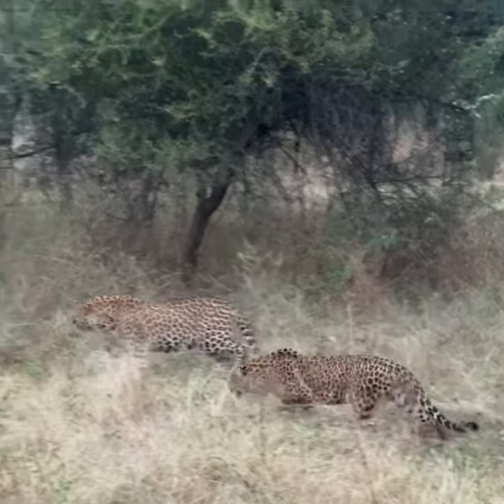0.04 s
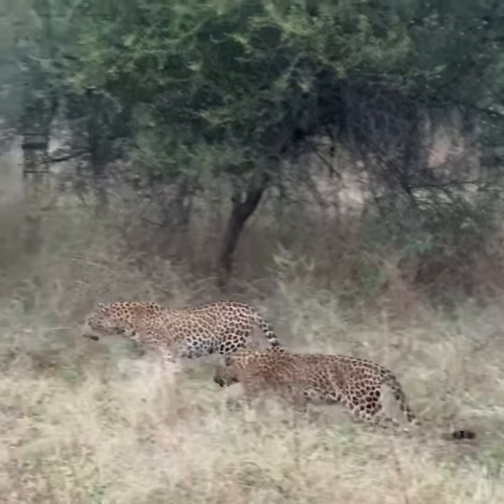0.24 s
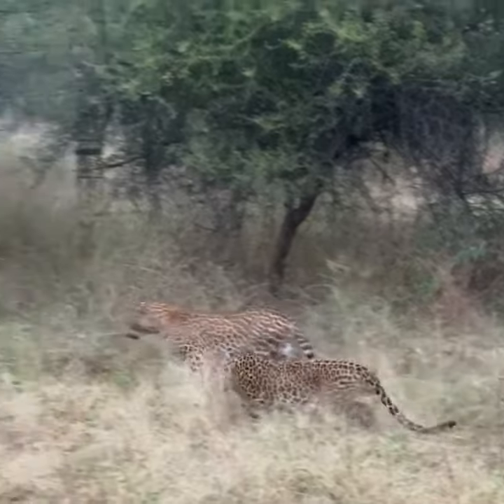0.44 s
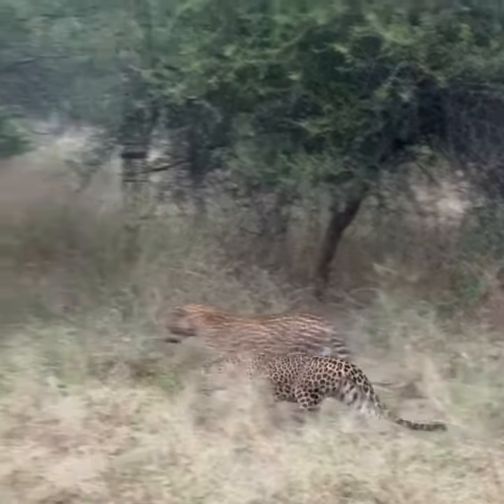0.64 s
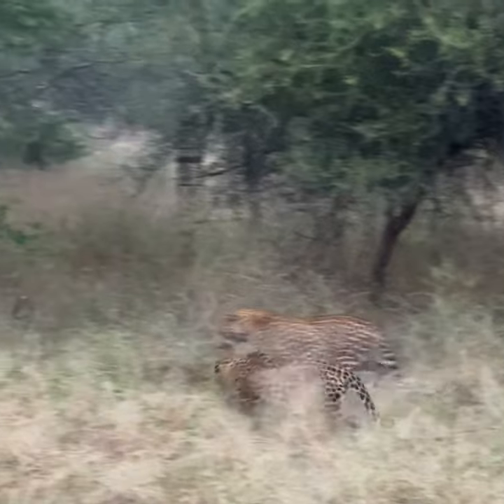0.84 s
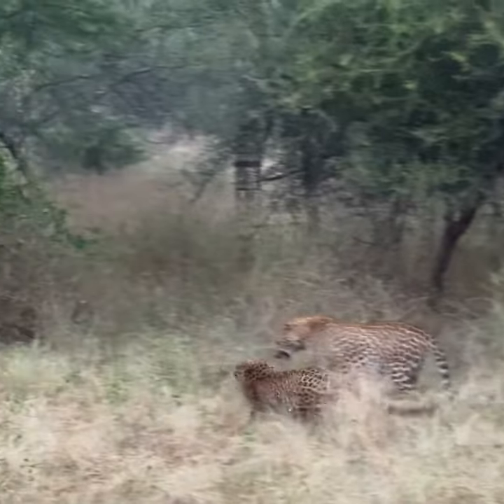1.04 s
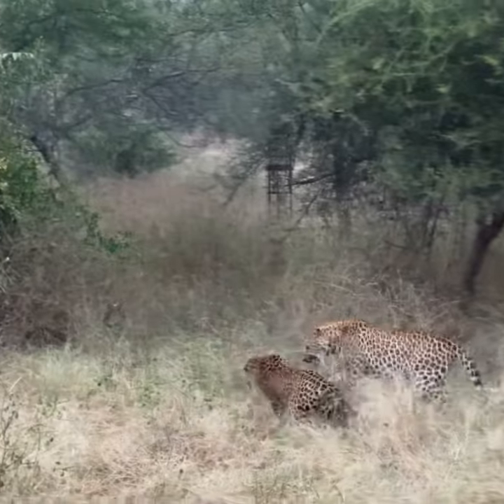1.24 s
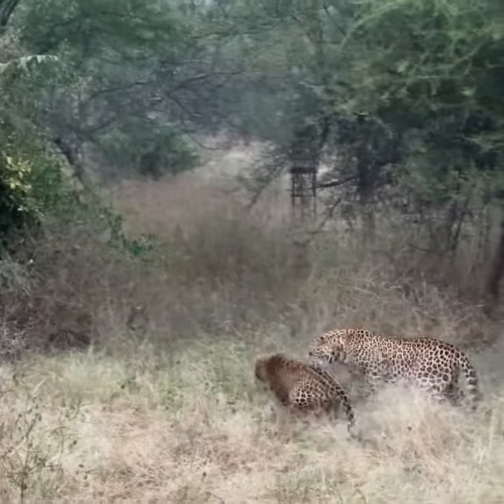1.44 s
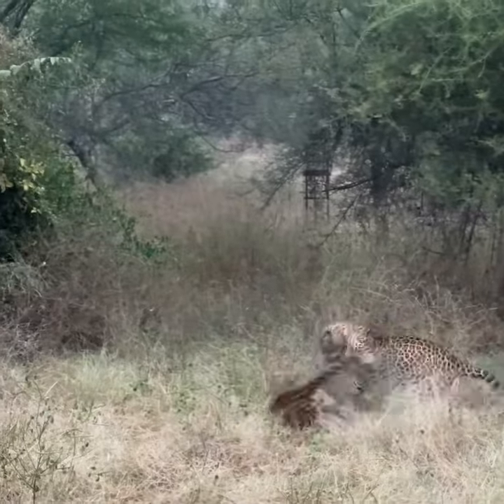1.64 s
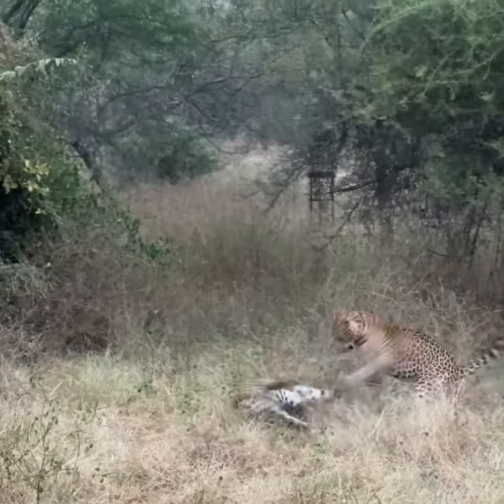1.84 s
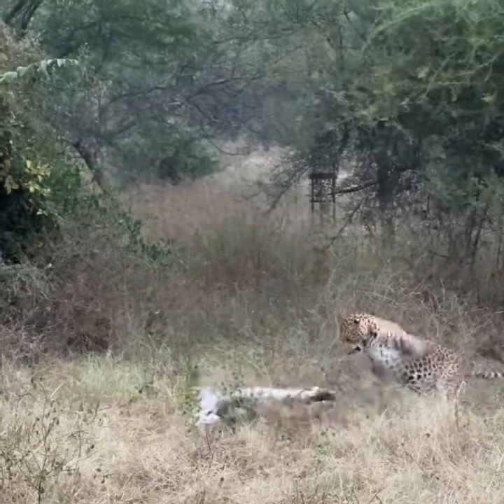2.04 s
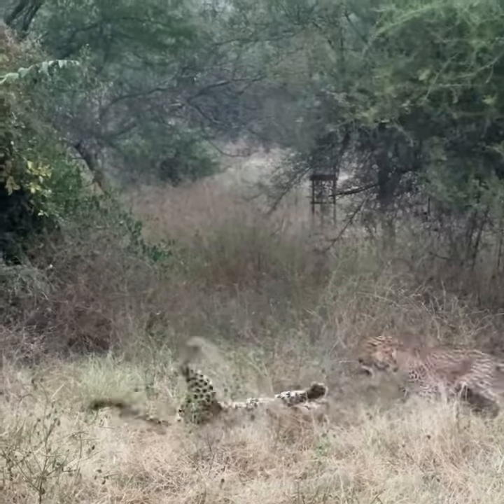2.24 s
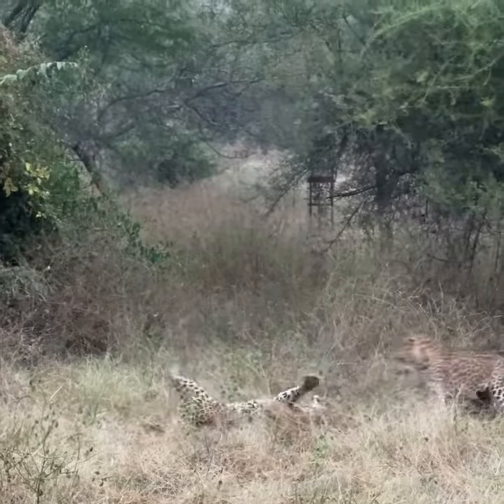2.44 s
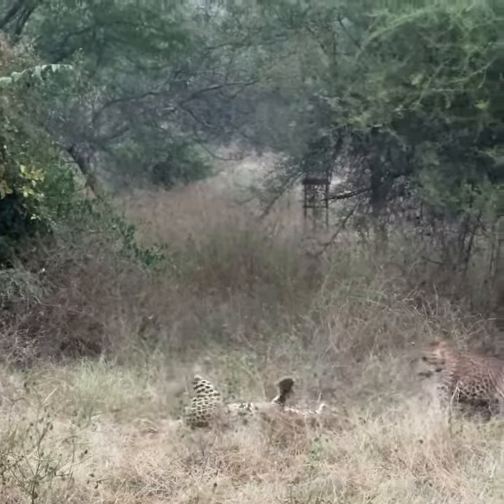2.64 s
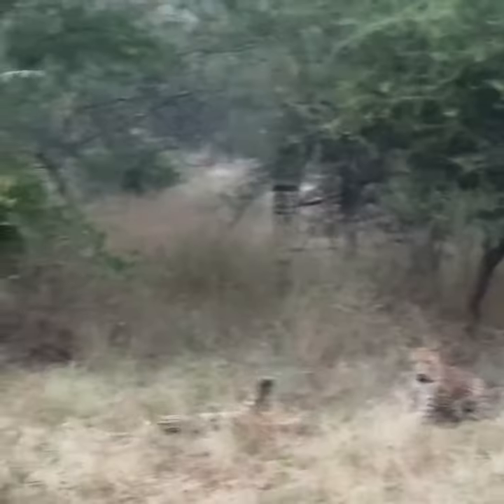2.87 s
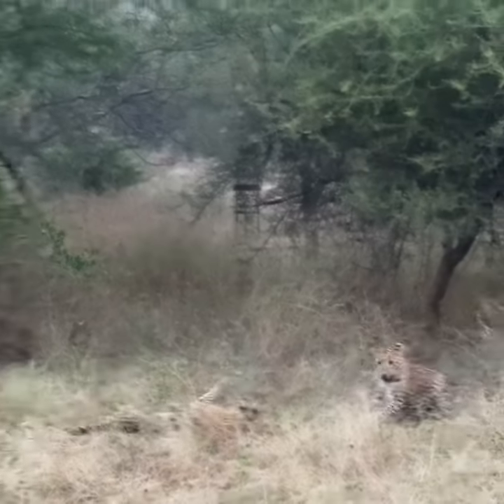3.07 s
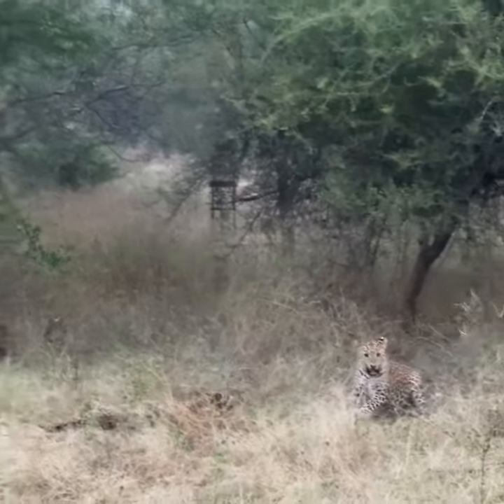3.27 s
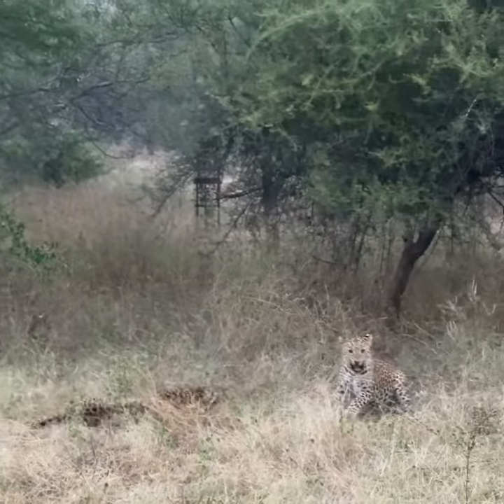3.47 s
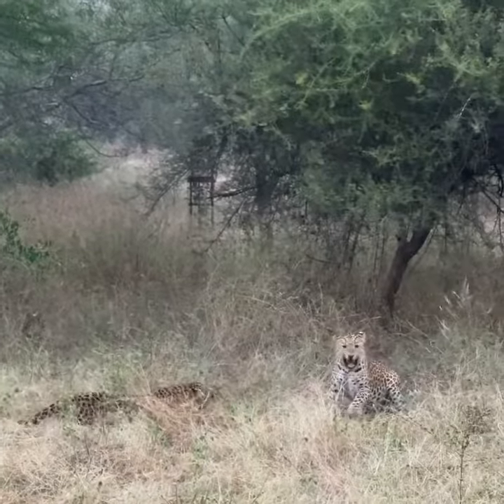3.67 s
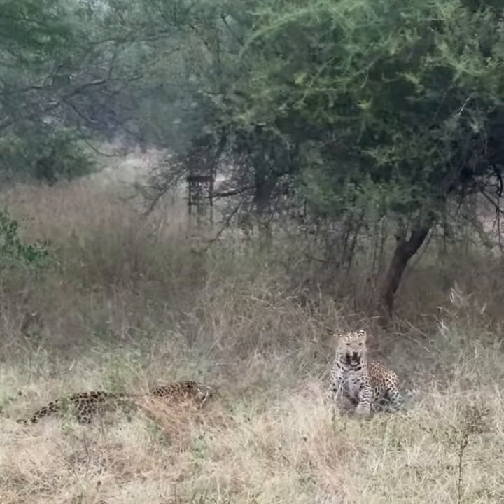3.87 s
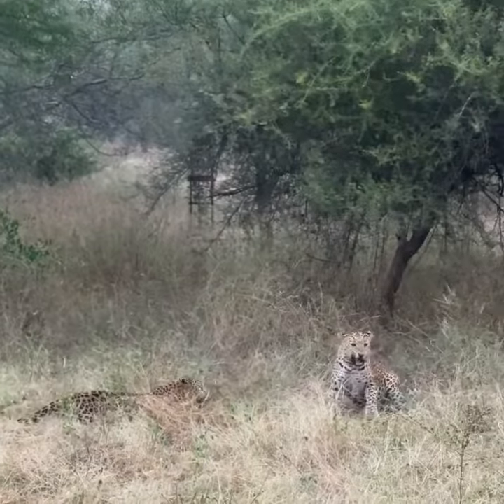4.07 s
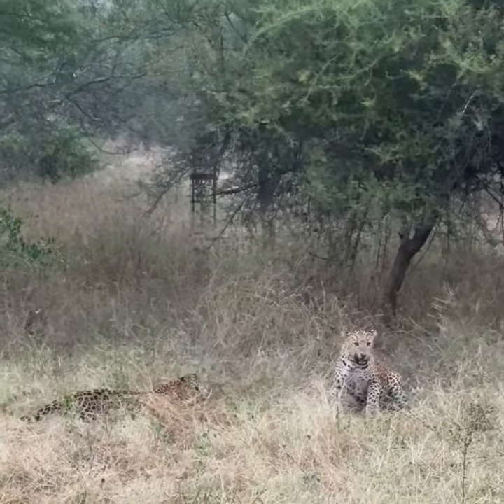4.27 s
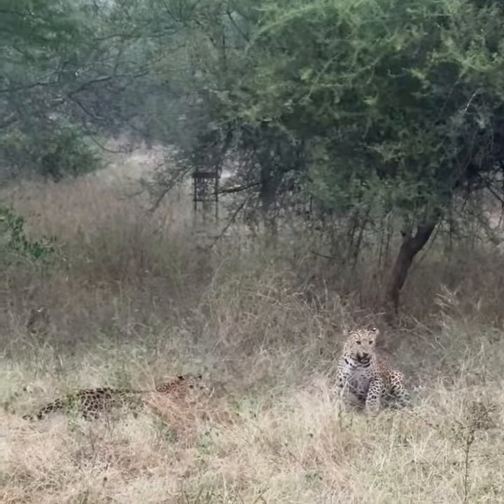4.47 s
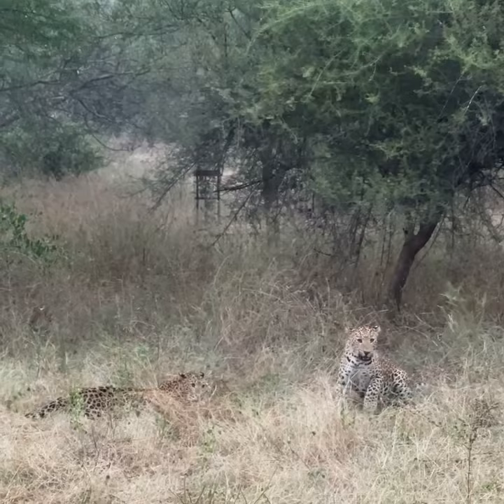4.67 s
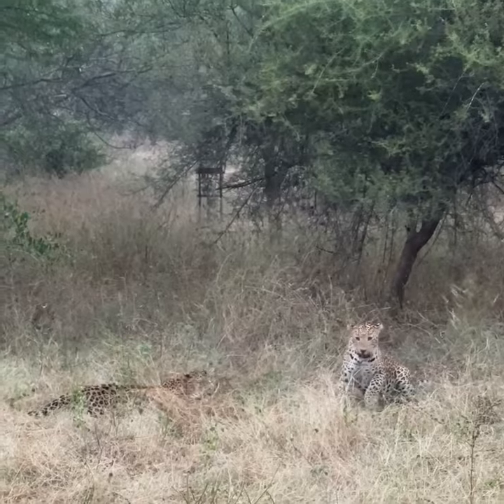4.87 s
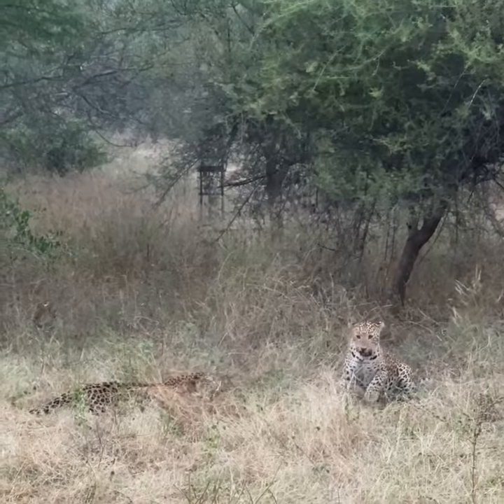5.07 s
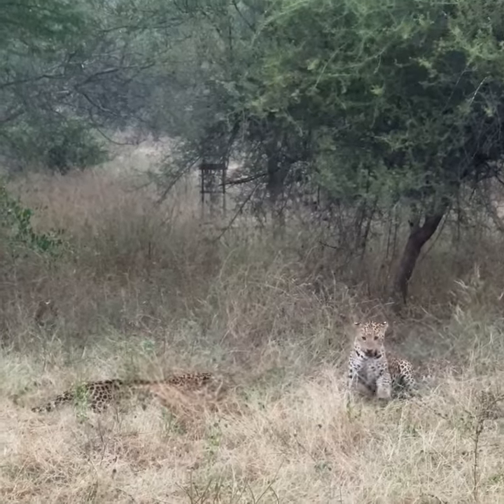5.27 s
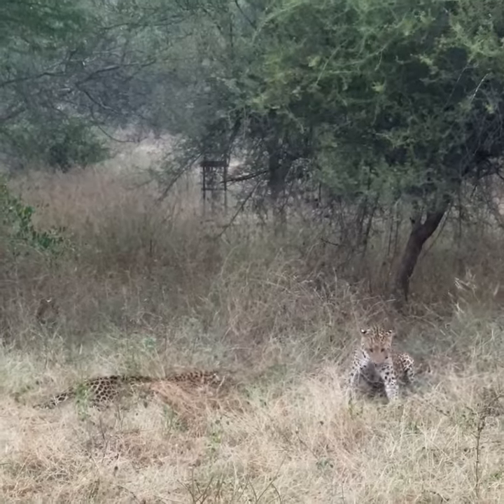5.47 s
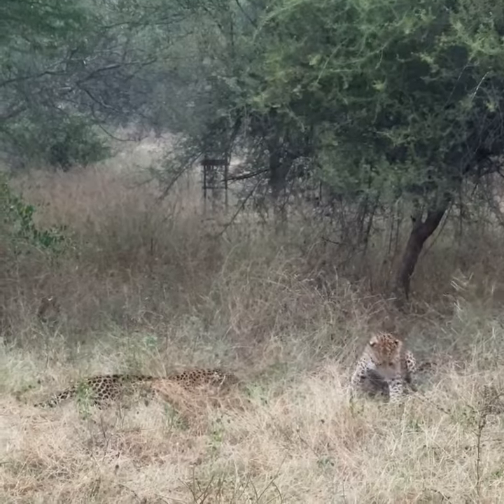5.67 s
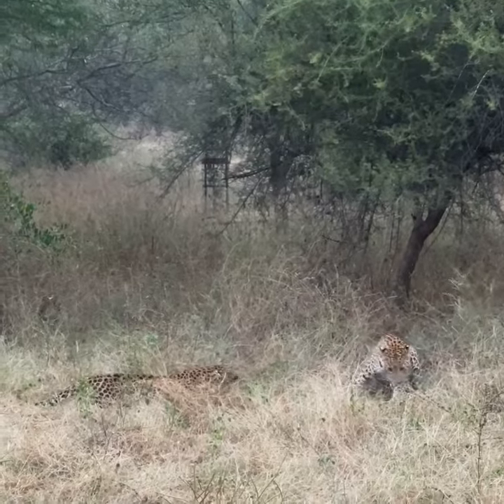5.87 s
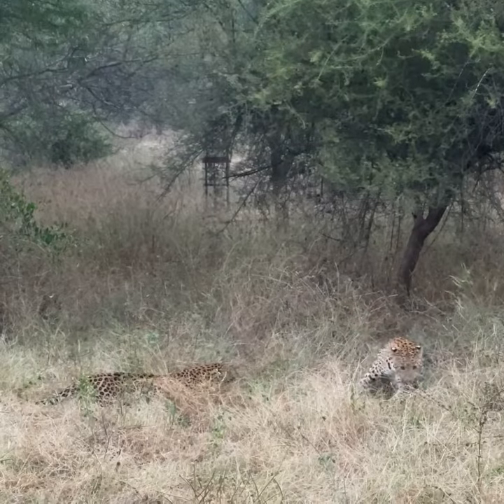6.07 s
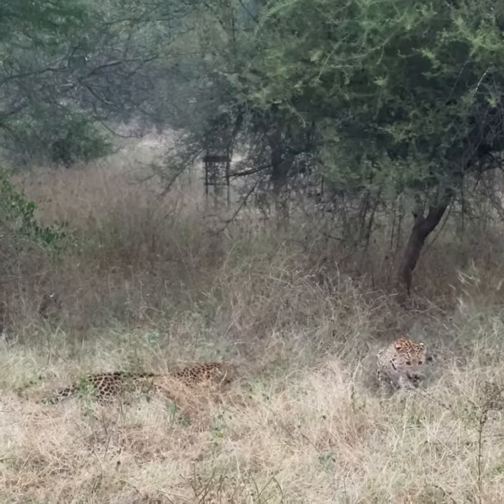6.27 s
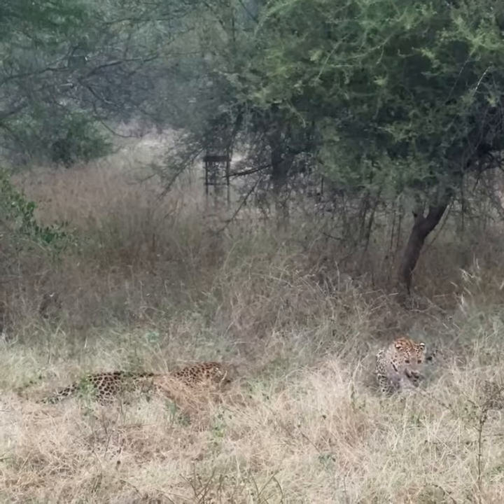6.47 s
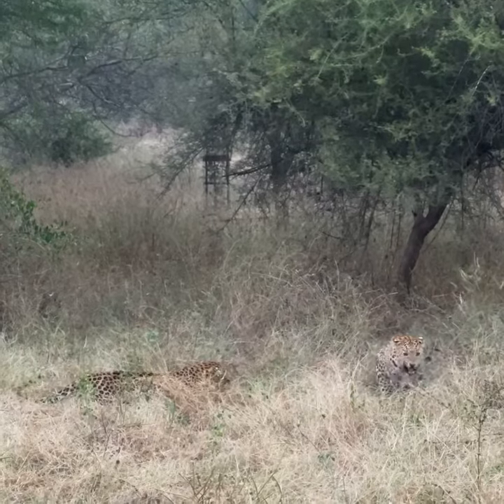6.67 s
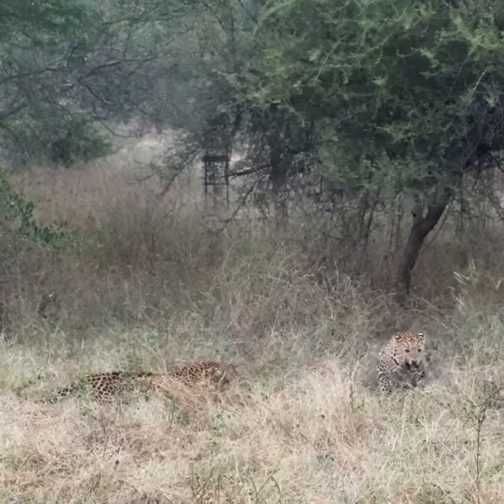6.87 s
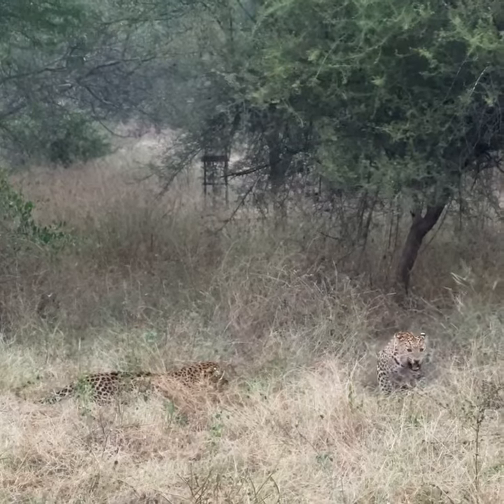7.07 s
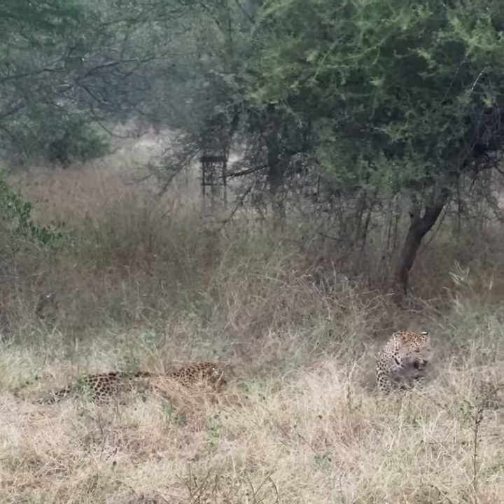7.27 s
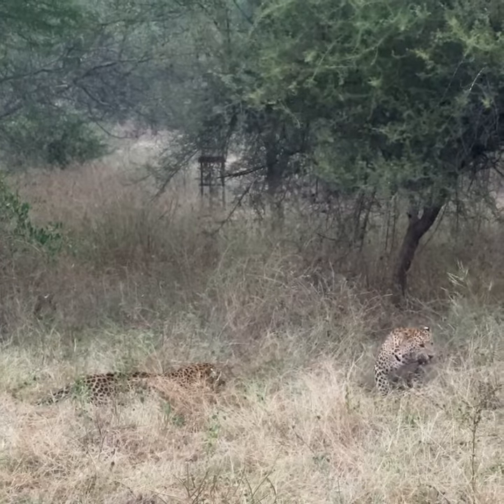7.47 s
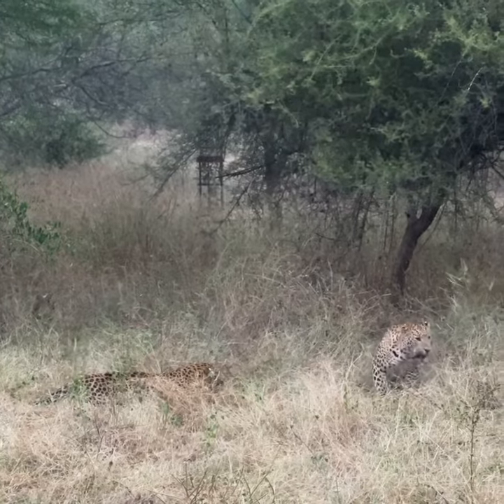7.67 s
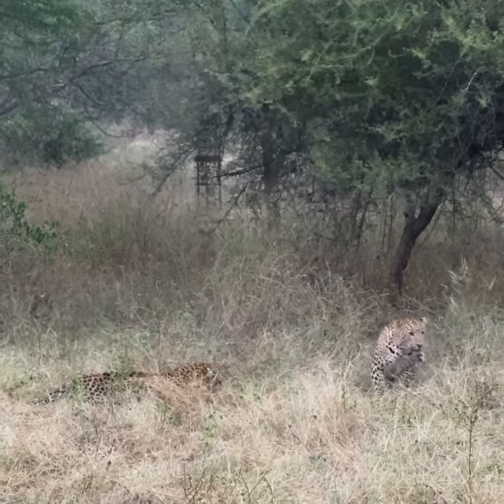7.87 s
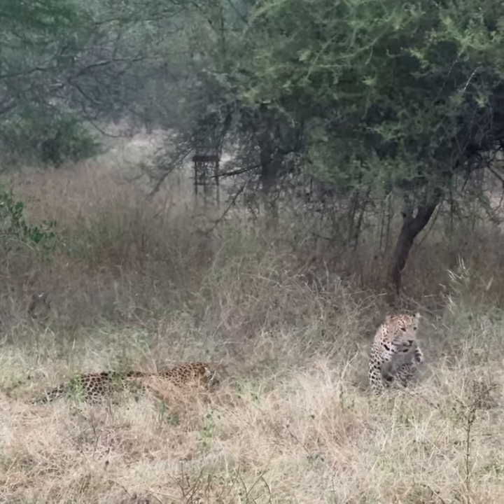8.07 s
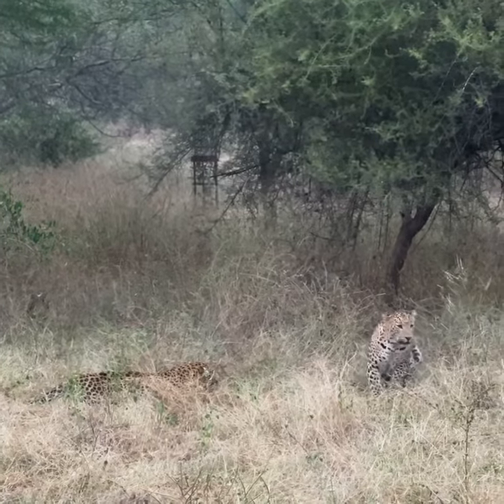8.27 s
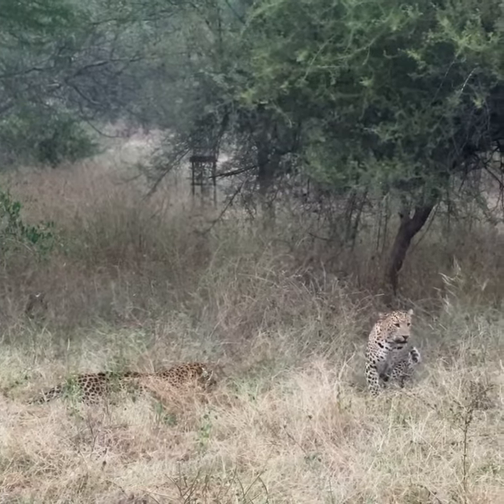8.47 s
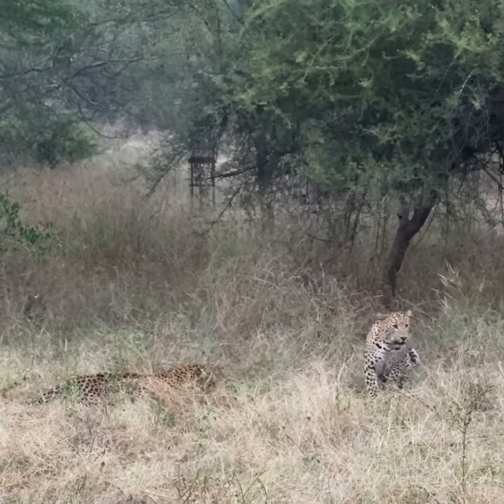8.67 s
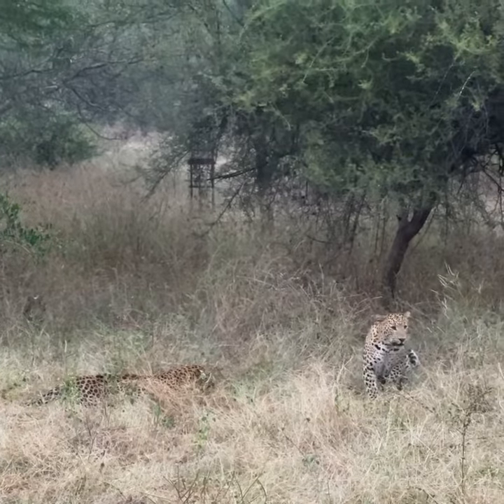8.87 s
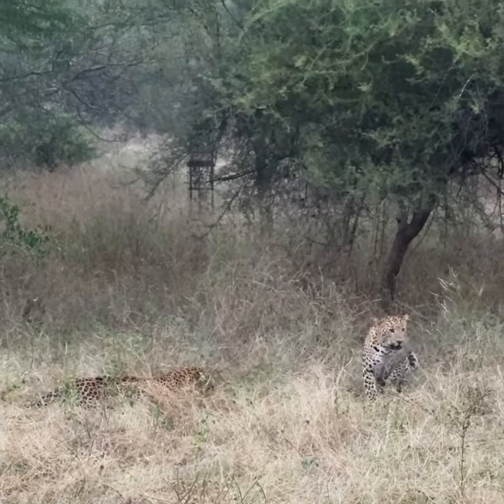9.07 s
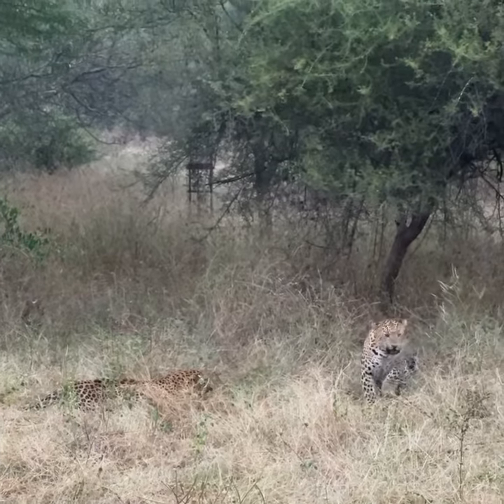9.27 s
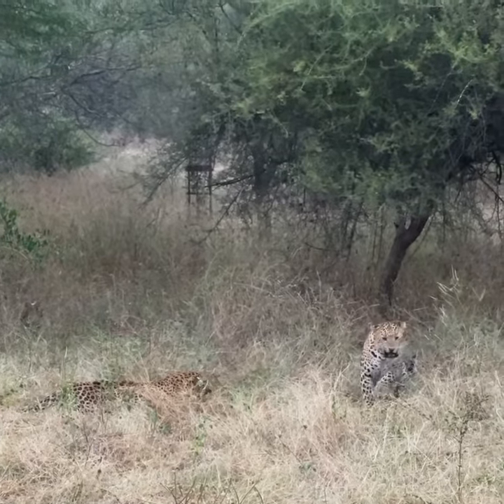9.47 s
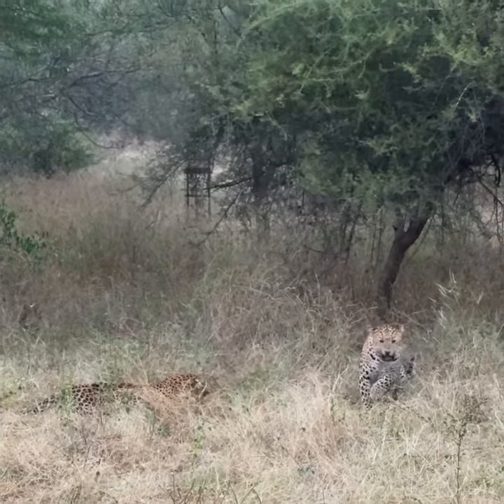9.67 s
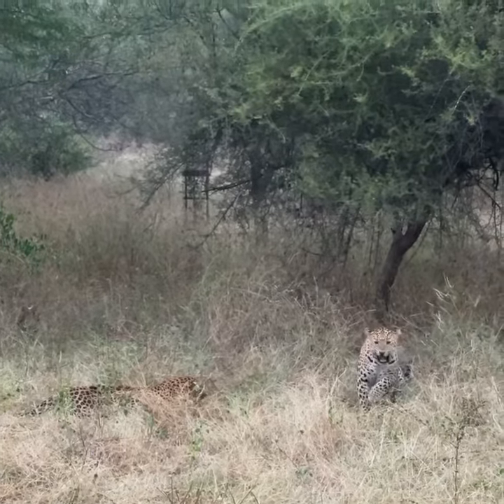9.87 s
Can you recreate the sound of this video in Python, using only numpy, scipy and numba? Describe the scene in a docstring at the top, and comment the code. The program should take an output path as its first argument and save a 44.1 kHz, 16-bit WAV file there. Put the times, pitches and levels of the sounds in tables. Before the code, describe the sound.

Leopard growls with separate fluttering pulses grow rougher and faster, peaking in a torn snarl while grass swishes and snaps. The call drops and slackens into a chesty rattle and breathy hisses. Later growls are brief and subdued, mixed with knocks, small clicks and closed-mouth rumbling. Thin bird chirps and late yelping notes sit behind. Open brushland, slight diffuse scatter, a quiet low-heavy background, handheld stereo pickup.

```python
"""A low rumble in rustling dry grass, then growls: two leopards squabble, the growl swells to a snarl,
then come hisses and weaker rumbles. Each vocal-fold flap thumps the chest, rings throat and mouth and
lets out rasping air; effort shapes each call. Single knocks and grunts are added one by one.
Noise makes hisses, snapping grass, sharp clicks and bush wash; gliding near-pure tones make the birds.
Scatter surrounds cats and birds; two microphone ports hear the treble out of step."""
import sys
import numpy as np
from scipy import signal
from scipy.fft import rfft, irfft
from scipy.io import wavfile
from scipy.ndimage import uniform_filter1d
from numba import njit

SR = 44100
rng = np.random.default_rng(int(sys.argv[2]) if len(sys.argv) > 2 else 0)


def pcm_store(signal):
    """Save signal as 16-bit PCM."""
    levels = np.round(np.clip(np.atleast_2d(signal), -1, 1) * 32767)
    wavfile.write(sys.argv[1], SR, levels.astype(np.int16).T)


N = 437472
TIME = np.arange(N) / SR
CLOCK = np.arange(0, N / SR, .002)  # control times, s
SIDES = np.array([[1], [-1]])  # left, right


def from_db(db):
    """Decibels to gain."""
    return 10 ** (np.asarray(db) / 20)


def rms_one(x):
    """Scale to rms 1."""
    return x / np.sqrt(np.mean(x ** 2) + 1e-20)


def curves(rows, at=TIME):
    """Join each table column by straight lines."""
    s, *columns = np.transpose(rows)
    return [np.interp(at, s, c) for c in columns]


def add(track, s, sound):
    """Mix a sound in at a time."""
    start = int(round(s * SR))
    low, high = max(start, 0), min(start + len(sound), N)
    if high > low:
        track[low:high] += sound[low - start:high - start]


def band(x, low_hz, high_hz, order=2):
    """Butterworth band-pass."""
    sos = signal.butter(order, [low_hz, high_hz], "band", fs=SR, output="sos")
    return signal.sosfilt(sos, x + 1e-18)


def colour(x, spectrum):
    """Minimum-phase filter with the given spectrum, by folding its cepstrum."""
    hz, db = np.transpose(spectrum)
    size = 4096
    grid_hz = np.fft.rfftfreq(size, 1 / SR)
    gain = from_db(np.interp(np.log(grid_hz + 1), np.log(hz), db))
    cepstrum = irfft(np.log(gain))
    cepstrum[1:size // 2] *= 2
    cepstrum[size // 2 + 1:] = 0
    return signal.fftconvolve(x, irfft(np.exp(rfft(cepstrum))))[:N]


def fade(x, decay_s):
    """Give every impulse an exponential tail."""
    return signal.lfilter([1], [1, -np.exp(-1 / (decay_s * SR))], x + 1e-18)


def even(x):
    """Hold the slow level at 1, keeping the single pulses."""
    size = int(.07 * SR)
    power = uniform_filter1d(uniform_filter1d(x ** 2, size), size)
    return x / np.sqrt(np.abs(power) + 1e-18)


@njit
def resonance(x, hz, width_hz):
    """Two-pole resonance with moving centre and width, gain about 1 on top."""
    y, radius = np.zeros(len(x)), np.exp(-np.pi * width_hz / SR)
    for i in range(2, len(x)):
        r = radius[i]
        drive = (1 - r * r) / 2 * (x[i] - x[i - 2])
        y[i] = drive + 2 * r * np.cos(2 * np.pi * hz[i] / SR) * y[i - 1] - r * r * y[i - 2]
    return y


def progress(s, length):
    """From 0 at the start of a gesture to 1 at its end."""
    return np.clip((CLOCK - s) / length, 0, 1)


def effort(s, length, swell_db, arch_db):
    """Effort in dB: swell is the change end to end, arch the drop from the middle to either end."""
    along = progress(s, length) - .5
    return swell_db * along - arch_db * (2 * along) ** 2


ATTACK_DB_PER_S, RELEASE_DB_PER_S = 294, 187.5  # at pace 1


def edges(s, length, pace=1):
    """Attack before a gesture and release after it, in dB."""
    attack_db = ATTACK_DB_PER_S * np.maximum(s - CLOCK, 0)
    release_db = RELEASE_DB_PER_S * np.maximum(CLOCK - s - length, 0)
    return -pace * (attack_db + release_db)


def envelopes(rows):
    """One gain curve for each level column of a gesture table."""
    db = [np.add.outer(levels, effort(s, length, swell, arch) + edges(s, length))
          for s, length, swell, arch, *levels in rows]
    return [np.interp(TIME, CLOCK, gain) for gain in from_db(np.max(db, axis=0))]


RASP_SPECTRUM = [(1000, -55), (1900, 3), (2500, 3.5), (3000, -4.5), (4000, -6.5), (5500, -6.5),
                 (12000, -23)]  # rasp colour: hz, gain_db
IDLE_DB = -57  # floor of the chest gain
GAPE_FLAPS_PER_S = 65  # here the mouth resonances are twice as wide
CLOSING_S = .0085  # flap time to slap of the folds


def leopard():
    """Chest thumps, throat ring, two mouth resonances and rasp, all driven by the same flaps."""
    flaps, rate, ribs_db = flap_times()
    thumps, throat, lower, upper, rasp, chest_hz, throat_hz, lower_hz, upper_hz = airway()
    lower_hz = lower_hz * wander(flaps, octaves=0.092)
    upper_hz = upper_hz * wander(flaps, octaves=0.096)
    # fast flaps come with a gaping mouth, which damps every resonance
    damping = 1 + np.interp(TIME, flaps, rate / GAPE_FLAPS_PER_S) ** 4
    deep_air = airflow(flaps, CLOSING_S, puff_s=0.008, slap_db=29, uneven_db=3.5, hiss_db=-14)
    air = airflow(flaps, CLOSING_S, puff_s=0.005, slap_db=29, uneven_db=4.5, hiss_db=-14)
    torn_air = airflow(flaps, CLOSING_S, puff_s=0.0045, slap_db=14, uneven_db=8.0, hiss_db=-14, soft_s=.0003)

    swept_hz = throat_hz * throat_sweep(flaps + CLOSING_S)
    throat_ring = even(band(resonance(deep_air, swept_hz, 59.0 * np.sqrt(damping)), 176, 473, order=3))
    lower_air = resonance(air, lower_hz, 55.0 * damping)
    lower_air += 0.35 * resonance(air, 0.67 * lower_hz, 70.0 * damping)
    lower_ring = even(band(lower_air, 490, 1000, order=3))
    upper_ring = even(band(resonance(air, upper_hz, 45.0 * damping), 1040, 2040, order=3))

    # higher mouth resonances move with the upper one; steady noise smooths the top
    steady_air = 0.1 * band(rng.standard_normal(N), 2200, 14000, order=1)
    ringing_air = 0.97 * torn_air + resonance(torn_air, 1.56 * upper_hz, 100.0 * damping)
    ringing_air += resonance(torn_air, 1.83 * upper_hz, 80.0 * damping)
    ringing_air += 0.86 * resonance(torn_air, 2.63 * upper_hz, 250.0 * damping)
    rasping = from_db(2.5) * rasp * even(colour(ringing_air + steady_air, RASP_SPECTRUM))

    chest_gain = np.maximum(thumps, from_db(IDLE_DB))  # faint rumble between calls
    body = chest_gain * chest(flaps, rate, np.interp(flaps, TIME, chest_hz), ribs_db)
    return body + throat * throat_ring + lower * lower_ring + upper * upper_ring + rasping


# open-mouthed calls, before effort, glide and roughness: start_s, length_s, swell_db, arch_db,
# flaps_per_s, flap_glide_octaves, ribs_re_chest_db, chest_db, throat_db, lower_mouth_db, upper_mouth_db,
# rasp_db, chest_hz, throat_hz, lower_mouth_hz, upper_mouth_hz, jaw_glide_octaves
GROWLS = [(0.403, 0.38, 3, 1.5, 28.5, 0.47, -7, -34.5, -48, -64.5, -64.5, -65.5, 231, 335, 1028, 1332, 0.035),
          (0.843, 0.28, -1, -1.5, 33, -0.1, -6.5, -31.5, -46, -53, -59, -60.5, 180, 316, 733, 1210, 0.032),
          (1.239, 0.32, 7.5, 2.5, 49, 0.25, -11, -31, -37.5, -43.5, -47.5, -51.5, 177, 370, 880, 1343, 0.14),
          (1.549, 0.12, 0, 1.5, 60.7, -0.38, -4, -25.5, -29.5, -37.5, -34.5, -46, 170, 315, 841, 1330, -0.083),
          (1.736, 0.061, 5, -3.5, 41.7, 0.18, -9, -34.5, -43.5, -55, -54, -60, 187, 328, 790, 1340, 0.092),
          (1.837, 0.058, 0, 0, 87.3, -0.28, 11, -36, -25.5, -36, -30.5, -46, 263, 370, 920, 1319, -0.064),
          (1.928, 0.063, -1.5, 4, 78, 0.032, 5, -34.5, -24.5, -35, -36.5, -46, 225, 326, 734, 1490, 0.025),
          (1.9916, 0.075, 5, 4, 78, -0.06, 9, -35.5, -23, -37, -31, -39.5, 216, 305, 796, 1370, -0.15),
          (2.084, 0.089, 0, 3, 77, -0.17, 1.5, -28, -27.5, -40.5, -38, -44, 204, 280, 684, 1320, -0.23),
          (2.214, 0.41, -13, 10.5, 48.2, -0.65, -6, -26.5, -35.5, -39, -39.5, -47, 191.7, 291, 841.7, 1439, -0.13),
          (2.714, 0.19, -1.5, 2.5, 33.6, -0.14, -7.5, -27.5, -41.5, -49.5, -54.5, -53, 187, 322, 771.2, 1180, -0.17),
          (4.287, 0.66, -4, 3, 26.8, 0.13, -5.5, -44, -69.5, -77, -74, -79, 153.9, 298.1, 1014, 1300, -0.058),
          (4.986, 0.41, -2.5, 4, 30.5, 0.19, -4.5, -36, -45.5, -62, -63.5, -62.5, 209.4, 340.3, 1120, 1420, 0.044),
          (5.519, 0.247, 4, 3.5, 30.7, 0.056, -7, -30.5, -42.5, -56.5, -54, -57.5, 160.1, 363.1, 930, 1415, -0.14),
          (5.781, 0.24, -2.5, 1.5, 31, -0.22, -3, -31.5, -42, -49, -59, -59, 165.4, 415, 884, 1218, -0.15),
          (6.93, 0.37, 0, 0.5, 22.2, -0.079, -4.5, -41.5, -54, -81, -69, -72, 236.6, 333, 952.3, 1322, -0.028),
          (9.112, 0.096, -1, 6, 23.2, -0.0099, -3, -40, -52.5, -66, -63, -78, 178.8, 342, 920, 1374, -0.19)]
# mouth shut: start_s, length_s, swell_db, arch_db, flaps_per_s, flap_glide_octaves, ribs_re_chest_db,
# chest_db, chest_hz
RUMBLES = [(0.013, 0.21, 7.5, -10, 23.8, -0.35, 0, -48, 153.5),
           (6.441, 0.33, 10, 17, 24.4, -0.14, -4, -49, 160),
           (7.571, 0.36, 2.5, 1.5, 27.7, -0.22, -10.5, -41, 167.2),
           (7.933, 0.34, -2, -0.5, 24.8, -0.39, -5.5, -45, 181.5),
           (8.347, 0.75, -0.5, 2, 22.6, 0.1223, -10.5, -50, 198),
           (9.446, 0.36, -2, -10, 26.1, -0.28, -2.5, -49.5, 196)]
# shut mouth re chest: throat_db, lower_mouth_db, upper_mouth_db, rasp_db
SHUT_RE_CHEST_DB = (-26, -57, -40, -32)
# shut mouth: throat_hz, lower_mouth_hz, upper_mouth_hz
SHUT_HZ = (298, 980, 1357)


def calls():
    """Growls and rumbles in order; a rumble is a growl muffled by the shut mouth."""
    growls = [tuple(row) for row in GROWLS]
    rumbles = [(*shape, db, *np.add(db, SHUT_RE_CHEST_DB), hz, *SHUT_HZ, 0) for *shape, db, hz in RUMBLES]
    return sorted(growls + rumbles)


# unsteadiness of the folds: time_s, roughness_0_to_1
ROUGHNESS = [(.76, .5), (.83, .25), (1.15, .25), (1.25, .6), (2.35, .7), (4.4, .45), (5.35, .65),
             (5.55, .35), (6.95, .3), (7.6, .5)]


def flap_times(jitter=0.041, lead_s=.02):
    """Time, rate and rib push per flap; folds restart each call, and slow, rough folds keep time worst."""
    rows, flaps = calls(), []
    handovers = [row[0] - lead_s for row in rows] + [N / SR]
    for (s, length, _, _, rate, glide, ribs_db, *_), begin, end in zip(rows, handovers, handovers[1:]):
        rates = rate * 2 ** (glide * (progress(s, length) - .5))
        turns = np.cumsum(rates) * CLOCK[1]
        turns -= np.interp(s, CLOCK, turns)
        at = np.interp(np.arange(-2, turns[-1]), turns, CLOCK)
        flaps += [(t, np.interp(t, CLOCK, rates), ribs_db) for t in at if max(begin, 0) < t < end]
    at, rate, ribs_db = np.transpose(flaps)
    (rough,) = curves(ROUGHNESS, at)
    shift_s = jitter * rough * rate.min() * rng.standard_normal(len(at)) / rate ** 2
    return at + shift_s, rate, ribs_db


CHEST_FOLLOWS = 0.44  # share of effort reaching the chest
LOWER_GLIDES, JAW_DB_PER_OCTAVE = 0.21, 12  # closing jaw lowers both resonances, favours the lower
THROAT_OCTAVES_PER_DB = 0.3552  # throat rises with effort, sinks as a call dies
PACE_ONE_FLAPS_PER_S = 36  # faster, tauter folds start and die quicker


def airway():
    """Gains of chest, throat, mouth pair and rasp, then four pitches; each call hands over to the next."""
    levels, pitches, weights = [], [], []
    for (s, length, swell, arch, rate, _, _, chest_db, throat_db, lower_db, upper_db, rasp_db,
         chest_hz, throat_hz, lower_hz, upper_hz, glide) in calls():
        push, edge = effort(s, length, swell, arch), edges(s, length, rate / PACE_ONE_FLAPS_PER_S)
        jaw = glide * (progress(s, length) - .5)
        shift = JAW_DB_PER_OCTAVE * jaw
        levels.append(edge + [chest_db + CHEST_FOLLOWS * push, throat_db + push, lower_db + push - shift,
                              upper_db + push + shift, rasp_db + push])
        lift = THROAT_OCTAVES_PER_DB * np.maximum(push + edge, -20)
        pitches.append(np.broadcast_arrays(chest_hz, throat_hz * 2 ** lift,
                                           lower_hz * 2 ** (LOWER_GLIDES * jaw), upper_hz * 2 ** jaw))
        weights.append([from_db(edge + chest_db) ** 2])
    hz = np.sum(np.multiply(pitches, weights), axis=0) / np.sum(weights, axis=0)
    gains = from_db(np.max(levels, axis=0))
    return [np.interp(TIME, CLOCK, control) for control in (*gains, *hz)]


def chest(flaps, rate, pitch, ribs_db, lead_s=0.00915, rise_s=0.0036, sag=0.69, sag_s=0.0094, rest=0.59,
          deep_hz=62, deep_spread=0.2, deep_s=0.008, uneven_db=3.5, rebound_s=0.01754, rebound_db=-10):
    """Each flap is a thump of a few cycles sagging in pitch; slow flaps also push the ribs, deeper."""
    out, t = np.zeros(N), TIME[:SR // 12]
    # rough flaps differ in strength, pitch and length
    chances = rng.standard_normal((len(flaps), 6)) * curves(ROUGHNESS, flaps)[0][:, None]
    slackness = np.minimum(32 / rate, 1) ** 2
    for s, hz, deep_db, slack, chance in zip(flaps, pitch, ribs_db, slackness, chances):
        size, detune, length, bounce, late, depth = chance
        swing = np.sin(2 * np.pi * deep_hz * (1 + deep_spread * depth) * t)
        ribs = from_db(deep_db) * t / deep_s * np.exp(1 - t / deep_s) * swing
        age = t / (rise_s * from_db(4.0 * length))
        glide_hz = hz * (1 + 0.14 * detune) * (rest + sag * np.exp(-t / sag_s))
        thump = (age / 2) ** 2 * np.exp(2 - age) * np.sin(2 * np.pi * np.cumsum(glide_hz) / SR)
        add(out, s - lead_s, from_db(uneven_db * size) * (thump - slack * ribs))
        # slack folds rebound with a weaker, ill-timed second thump
        rebound = slack * from_db(rebound_db + 2 * uneven_db * bounce) * thump
        add(out, s - lead_s + rebound_s * from_db(2 * late), rebound)
    return even(band(out, 52.8, 242, order=3))


def airflow(flaps, delay_s, puff_s, slap_db, uneven_db, hiss_db, rebound_db=-11, soft_s=0.00045):
    """Folds slap shut, rebound about half a cycle later, each with a puff; roughness adds air and scatter."""
    slaps, (rough,) = np.zeros(N), curves(ROUGHNESS)
    rebounds = flaps[:-1] + np.diff(flaps) * rng.uniform(0.3446, .65, len(flaps) - 1)
    for times, db in ((rebounds, rebound_db), (flaps, 0)):
        at = np.clip((times + delay_s) * SR, 0, N - 1).astype(int)
        chance = np.clip(rng.standard_normal(len(times)), -2, 1)
        slaps[at] = from_db(db + uneven_db * np.sqrt(rough[at]) * chance)
    soft = fade(slaps, soft_s) / (soft_s * SR)
    turbulence = rough * (fade(soft, puff_s) + from_db(hiss_db)) * rng.standard_normal(N)
    return turbulence + from_db(slap_db) * soft


SWEEP_SHARE, SWEEP_S = 0.54, 0.0025  # initial rise above rest, decay time


def throat_sweep(closures):
    """Pitch factor: the throat resonance starts high at every flap and drops as the folds seal."""
    latest = np.maximum(np.searchsorted(closures, TIME) - 1, 0)
    age_s = np.abs(TIME - closures[latest])
    return 1 + SWEEP_SHARE * np.exp(-age_s / SWEEP_S)


def wander(flaps, octaves, count=3):
    """Pitch factor drifting over a few flaps: tongue and lips never hold still."""
    turns = flaps[::count]
    drift = octaves * curves(ROUGHNESS, turns)[0] * rng.standard_normal(len(turns))
    return 2 ** np.interp(TIME, turns, drift)


# lone grunts: start_s, peak_db
GRUNTS = [(3.169, -34.5), (3.196, -41), (3.244, -41), (3.289, -37.5), (3.406, -52), (3.436, -41)]


def grunts(length_s=.028, start_hz=440, end_hz=130):
    """Lone flaps of the folds: dull blips that fall in pitch."""
    out, hz = np.zeros(N), np.geomspace(start_hz, end_hz, int(length_s * SR))
    blip = np.hanning(len(hz)) * np.sin(2 * np.pi * np.cumsum(hz) / SR)
    for s, db in GRUNTS:
        add(out, s, from_db(db) * blip)
    return out


# single throat knocks: start_s, ring_db, ring_hz, crack_peak_db
KNOCKS = [(3.993, -48, 1272, -47), (4.04, -48, 1204, -44.5), (4.084, -48, 1197, -39),
          (4.519, -60, 1295, -51.5), (4.559, -55.5, 1327, -54), (4.995, -53, 1130, -45),
          (5.366, -49, 1522, -56), (5.542, -38, 1478, -56), (5.56, -43, 1547, -58), (5.92, -43, 1198, -49),
          (9.084, -53.5, 1390, -54), (9.123, -52, 1430, -55)]
# mouth modes in a knock: ratio_to_ring_hz, level_re_ring_db, decay_s
KNOCK_MODES = [(.81, -11, 0.0092), (0.998, 2, 0.0087), (1.75, -9.5, .007), (2.5, -7.5, .004)]


def knocks(crack_s=0.0037):
    """The folds snap shut once: a short crack, and the mouth rings on."""
    out, t = np.zeros(N), TIME[:SR // 12]
    for s, ring_db, hz, crack_db in KNOCKS:
        ring = sum(from_db(db) * np.exp(-t / decay_s) * np.sin(2 * np.pi * ratio * hz * t)
                   for ratio, db, decay_s in KNOCK_MODES)
        crack = band(rng.standard_normal(len(t)) * np.exp(-t / crack_s), 770, 4100)
        add(out, s, from_db(ring_db) * ring + from_db(crack_db) * crack / np.abs(crack).max())
    return out


# hisses: start_s, length_s, swell_db, arch_db, mouth_db, teeth_db
HISSES = [(2.7, 0.18, -7.5, 0, -50.5, -53.5), (3.5, 0.49, -3, 4, -56.5, -65), (5.68, 0.28, -6, 2, -68, -58),
          (6.31, 0.26, -8, 1, -66, -66)]
# hiss colour: hz, gain_db
MOUTH_AIR = [(150, -28), (250, 1.5), (539, -8), (1230, -3), (2050, -19.5), (3500, -15.5), (5030, -35),
             (8000, -24.5), (10400, -62)]


def hisses(teeth_hz=3100, width_hz=1100):
    """Air forced through the open mouth and past the teeth: two coloured noises."""
    mouth, teeth = envelopes(HISSES)
    jet = resonance(rng.standard_normal(N), teeth_hz * np.ones(N), width_hz * np.ones(N))
    breath = rms_one(colour(rng.standard_normal(N), MOUTH_AIR))
    return mouth * breath + teeth * rms_one(band(jet, 900, 4800))


# cats moving through grass: start_s, length_s, swell_db, arch_db, level_db
MOVES = [(0, 0.78, 6, -4, -66), (1.08, 0.61, 6, -6.5, -55), (1.85, 0.72, -4, 3, -48.5),
         (2.68, 0.23, -11.5, -2, -54), (2.95, 0.32, 1, 10, -69), (3.55, 0.63, 5, 1, -69),
         (5.58, 0.61, -7, 9, -64.5), (6.27, 0.31, -4, -2, -70)]
# grass and click colour: hz, gain_db
GRASS_SPECTRUM = [(1500, 2.5), (3500, 4.5), (5700, -0.5), (8500, 3.5), (10300, 9), (11400, -2.5),
                  (13500, -23.5)]


def grass(snaps_per_s=1200, spread_db=6.5, swish=1.0):
    """Dry stalks swish and snap: steady noise plus random impulses of uneven strength."""
    snaps = (rng.random(N) < snaps_per_s / SR) * from_db(spread_db * np.minimum(rng.exponential(1, N), 4))
    rustle = colour((snaps + swish) * rng.standard_normal(N), GRASS_SPECTRUM)
    return envelopes(MOVES)[0] * rms_one(rustle)


# sharp clicks: start_s, level_db (before gain and colour)
CLICKS = [(0.247, -45.5), (0.26, -44.5), (2.002, -40), (2.026, -43), (2.5201, -41.5), (3.024, -52.5),
          (6.0455, -51.5), (6.2855, -54), (6.313, -54.5), (6.9365, -50), (6.997, -54), (7.898, -59),
          (8.0448, -50), (8.078, -58), (8.467, -54), (8.585, -50.5), (8.6187, -54.5), (8.941, -55.5),
          (8.9734, -52), (9.018, -56.5), (9.339, -53), (9.358, -48.5), (9.746, -52), (9.7642, -48.5)]


def clicks(decay_s=0.007, gain_db=1):
    """Short bright cracks: decaying noise bursts."""
    hits = np.zeros(N)
    for s, db in CLICKS:
        add(hits, s, from_db([db + gain_db]))
    return colour(fade(hits, decay_s) * rng.standard_normal(N), GRASS_SPECTRUM)


def bird(note, sung, partials=((1, 0),), waver=0.0092, flutter=0.0098):
    """A near-pure gliding note, pitched a little differently each time; partials are (ratio, level_db)."""
    out, t = np.zeros(N), TIME[:int(note[-1][0] * SR)]
    hz, db = curves(note, t)
    for (s, call_db), detune in zip(sung, rng.standard_normal(len(sung))):
        shake = rms_one(fade(rng.standard_normal(len(t)), 0.0031))
        phase = 2 * np.pi * np.cumsum(hz * (1 + waver * detune + flutter * shake)) / SR
        tone = sum(from_db(part_db) * np.sin(ratio * phase) for ratio, part_db in partials)
        add(out, s, from_db(db + call_db) * signal.windows.tukey(len(t), .1) * tone)
    return out


# bird notes: time_in_note_s, pitch_hz, level_db
SLUR = [(0, 5690, -4), (.045, 4800, 1)]
CHIP = [(0, 4600, -1.5), (.028, 6300, -0.5), (.06, 4030, -1.5)]
WHISTLE = [(0, 4080, 5.4), (.1, 3930, 14), (.29, 3770, 5)]
YELP = [(0, 2014, -6), (.022, 1531, -8), (.05, 1651, 2.5), (.1, 1589, -10.5)]
# when sung: start_s, level_db
SLURS = [(0.124, -62), (3.244, -63), (4.23, -64), (6.144, -63.5), (8.447, -66.5), (9.413, -64)]
LONE_CHIPS = [(8.317, -74), (9.29, -68)]
WHISTLES = [(-0.16, -74), (3.77, -76.5), (9.011, -79)]
YELPS = [(8.495, -54.5), (8.617, -52.5), (8.753, -51)]
CHIP_AFTER_S = .057  # slur start to chip start


def bird_calls():
    """Slurs each followed by a chip, lone chips, whistles and two-partial yelps."""
    chips = [(s + CHIP_AFTER_S, db) for s, db in SLURS] + LONE_CHIPS
    yelps = bird(YELP, YELPS, [(1, 0), (2 / 3, -12)])
    return bird(SLUR, SLURS) + bird(CHIP, chips) + bird(WHISTLE, WHISTLES) + yelps


# bush colour: hz, gain_db
BUSH_SPECTRUM = [(25, -9.5), (80, 23.5), (500, -5), (1800, -9), (2300, -8), (3200, -17.5), (8000, -28),
                 (13500, -29)]
# bush wash: time_s, level_db
BUSH_LEVEL = [(0, -53), (3.4, -55), (4.2, -58), (4.75, -68), (5.0, -57), (6.2, -57.5), (6.9, -56.5)]


def bush():
    """Soft coloured-noise wash, with a second noise opposed left to right for width."""
    wash, spread = (rms_one(colour(rng.standard_normal(N), BUSH_SPECTRUM)) for _ in range(2))
    return from_db(curves(BUSH_LEVEL)[0]) * (wash + 0.54 * band(spread, 330, 7200) * SIDES)


def thicket(x, t60_s, wet_db):
    """Diffuse scatter from trunks and bushes: a decaying noise tail, different on each side."""
    t = TIME[:SR]
    tail = rng.standard_normal((2, SR)) * from_db(-60 * t / t60_s) * (1 - np.exp(-t / 0.0023))
    tail = tail / np.sqrt(np.sum(tail[0] ** 2))
    stereo_tail = tail[0] + 0.09 * band(tail[1], 1300, 6300) * SIDES
    return from_db(wet_db) * signal.fftconvolve(x[None], stereo_tail, axes=1)[:, :N]


def scene():
    """The cats in front, birds further off, the wash of the bush all round."""
    cats = leopard() + grunts() + knocks() + hisses() + grass()
    birds = bird_calls()
    # 624-820 Hz is a little stronger on the right
    direct = cats - 0.26 * band(cats, 624, 820, order=1) * SIDES
    cat_scatter = thicket(band(cats, 140, 13000, order=1), t60_s=0.4, wet_db=-11)
    return direct + clicks() + birds + bush() + cat_scatter + thicket(birds, t60_s=1.0, wet_db=-7.5)


# phase between microphone ports: hz, phase_rad
PORTS = [(0, 0), (1900, .1), (2500, .55), (4300, 1.3), (4900, 2.6), (5700, .3), (7000, 1.5), (8200, 1.9),
         (8650, 3), (9400, 3), (9700, 1.3), (11100, 1.5), (11600, .4)]
CUTOFF_HZ = 13700


def record(dry):
    """The two ports hear the treble out of step, half the phase each way; the top is cut."""
    phase, = curves(PORTS, np.fft.rfftfreq(N, 1 / SR))
    ported = irfft(rfft(dry) * np.exp(.5j * phase * SIDES), N)
    return signal.sosfilt(signal.ellip(10, .1, 70, CUTOFF_HZ, fs=SR, output="sos"), ported)


dry = scene()
out = record(dry)
pcm_store(out)
```